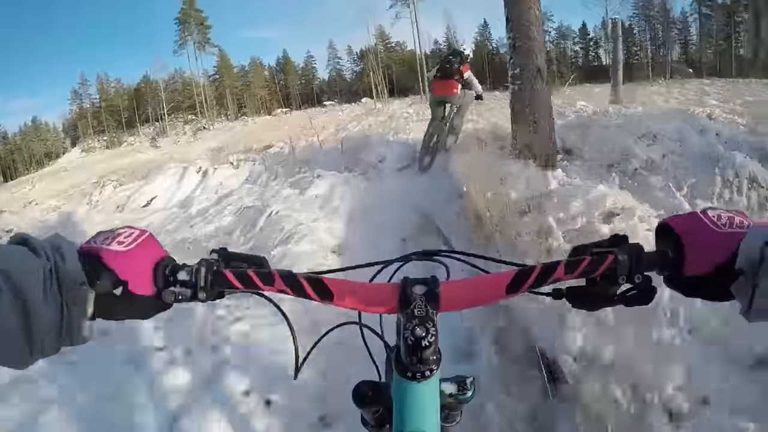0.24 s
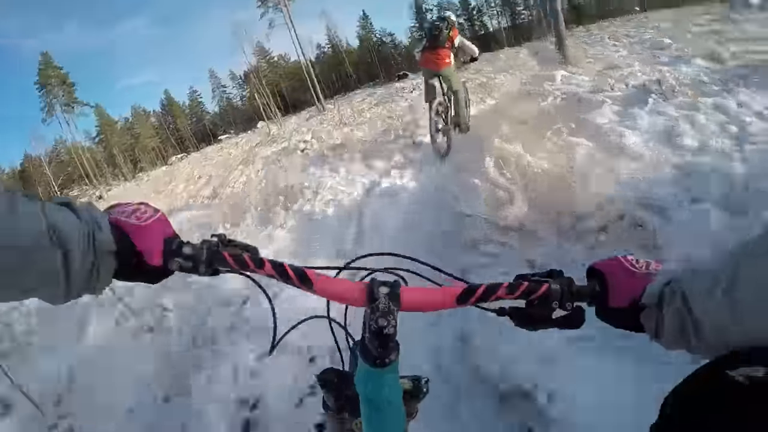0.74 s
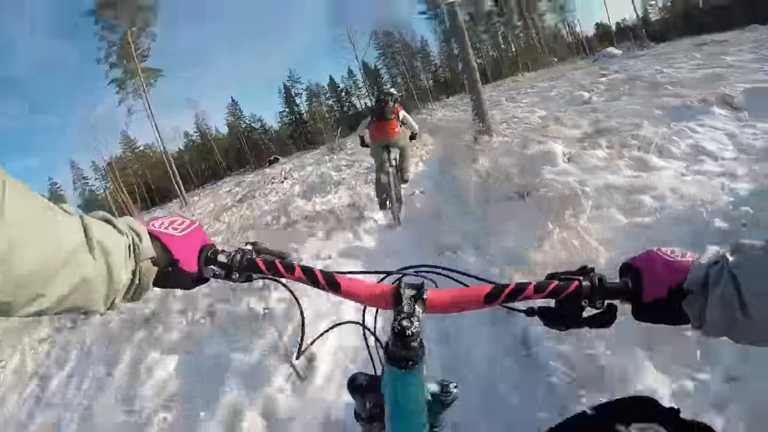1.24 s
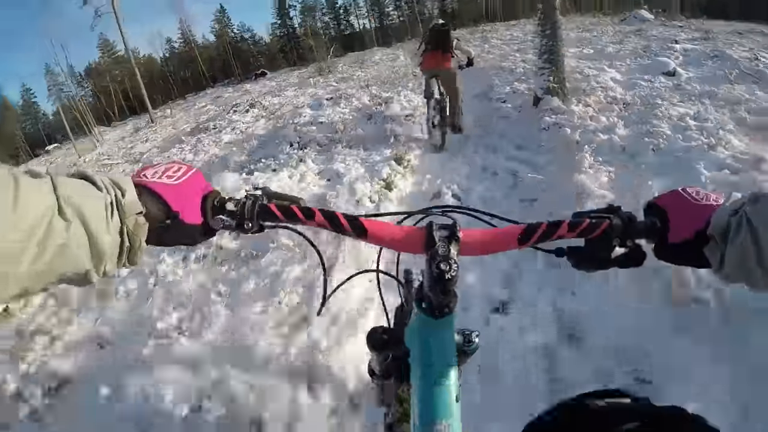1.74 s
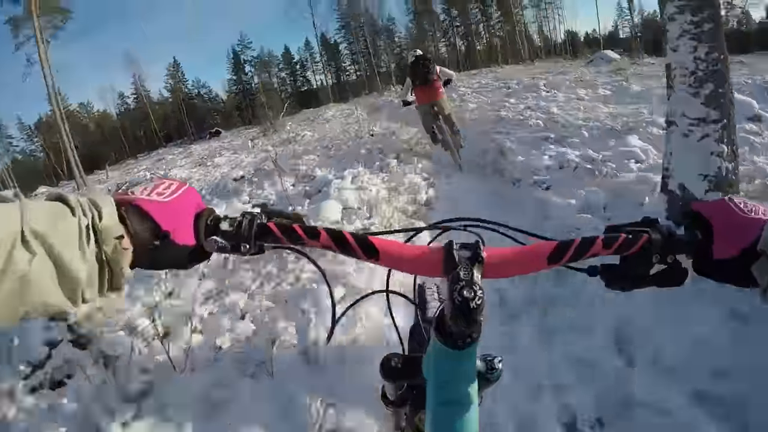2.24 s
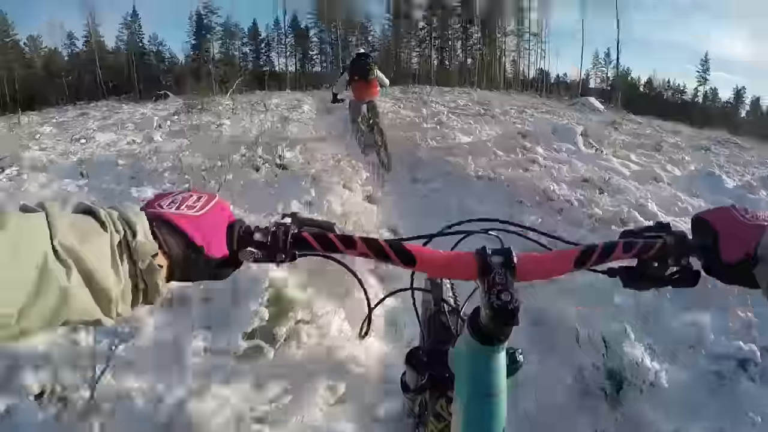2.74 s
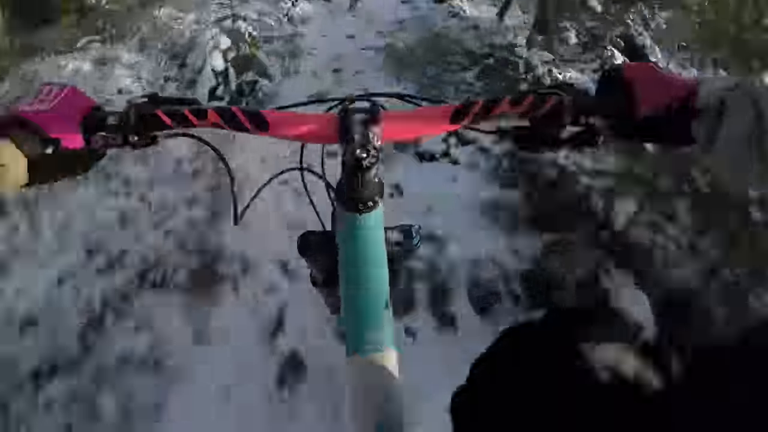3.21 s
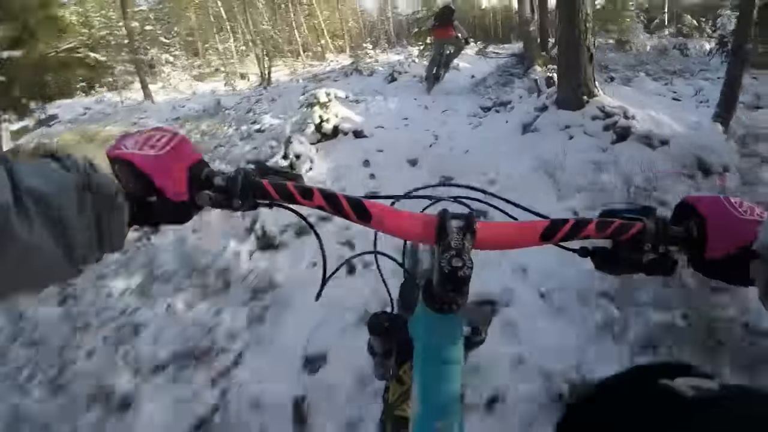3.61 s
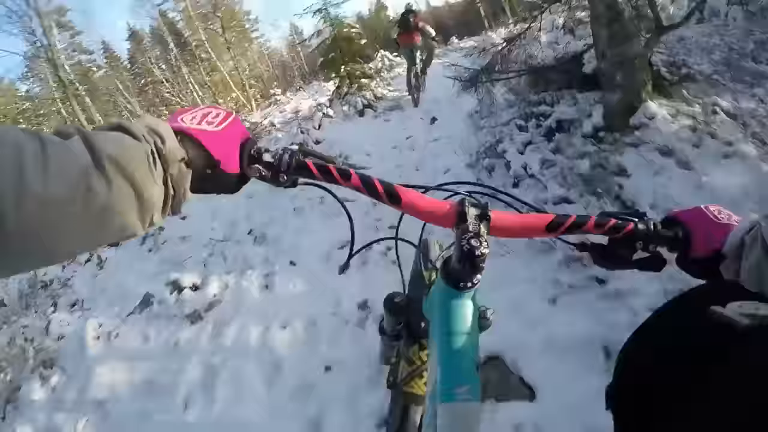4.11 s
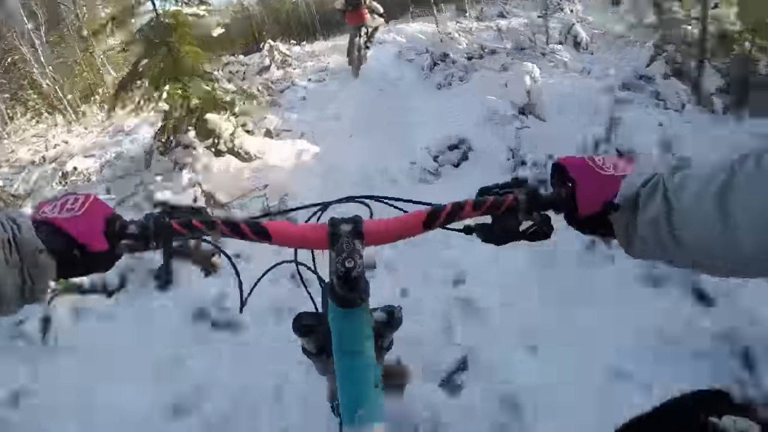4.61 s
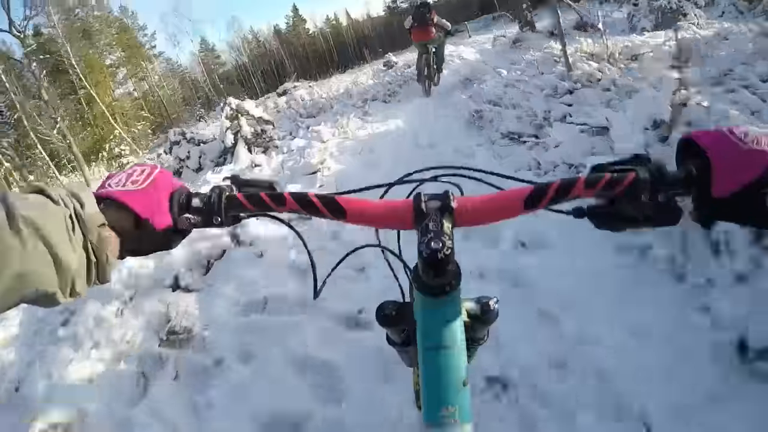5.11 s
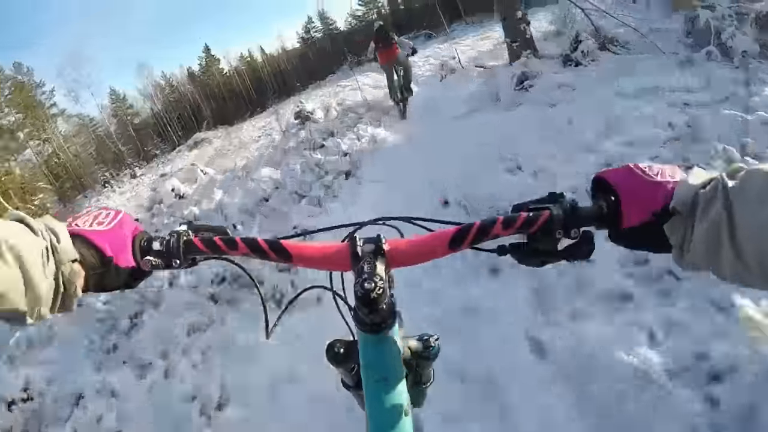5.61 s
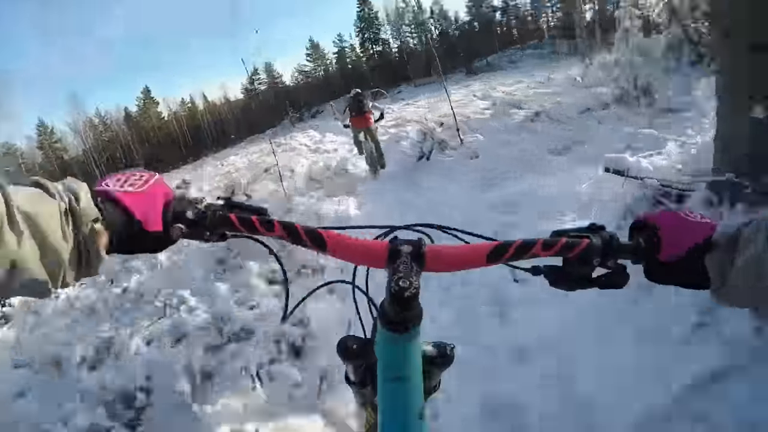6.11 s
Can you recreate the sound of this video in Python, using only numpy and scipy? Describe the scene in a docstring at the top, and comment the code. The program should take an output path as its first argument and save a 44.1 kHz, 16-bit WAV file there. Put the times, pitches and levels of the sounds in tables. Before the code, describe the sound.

Close on the rider's chest, outdoors and without echo, bike tyres grind through snow with a steady gritty rasp and soft powder hiss over a deep rumble. Two hard plastic clacks hit early, then the ride calms to light knocks. Midway comes a dense rattling run of loud clacks, soft thuds and icy crunches, thinning again before one last strong knock and a quieter ending.

```python
"""Mountain bike on a snowy trail

A mountain bike runs down a snowy forest trail, heard from a camera on the rider's chest.
The tyres hiss, rasp and crunch through snow: noises made of random clicks, each given its own spectrum.
Below lies a deep rumble of air and shaking, made of filtered noise, and a drone made of clicks.
Bumps make the camera's mount clack (a filtered ring) and sway (one slow swing). Roots thud through
the bike as a shove and fading tones, and flung snow ticks on the case."""
import sys
import numpy as np
from scipy import signal
from scipy.fft import rfft, irfft
from scipy.io import wavfile

SR = 44100
rng = np.random.default_rng(int(sys.argv[2]) if len(sys.argv) > 2 else 0)


def materialize(psi):
    """Save the field psi as 16-bit PCM at rate SR to the path in sys.argv[1].

    A 1-D psi becomes a single channel; in a 2-D psi each row is a channel.
    """
    bounded = np.clip(np.atleast_2d(psi).T, -1, 1)
    quanta = np.round(bounded * 32767).astype(np.int16)
    wavfile.write(sys.argv[1], SR, quanta)


N = 280035
T = np.arange(N) / SR  # time of every sample [s]

# how hard the bike runs over the ground: (time [s], pace [dB])
RIDING_PACE = [(0, 3.5), (.25, 0), (.6, -2), (.9, 2.5), (1.3, -0.5), (1.7, -4), (1.95, -2.5), (2.25, -1),
               (2.75, .5), (2.95, 0.5), (3.2, 2.5), (4.1, 5.5), (4.45, -0.5), (5.3, 1), (5.95, -4.5),
               (6.15, -.5), (6.35, -1)]
# a tyre meets a root or rut: (time [s], level [dB])
ROOT_HITS = [(0.057, -28), (0.791, -25.5), (0.868, -22.5), (0.961, -22.5), (2.144, -15.5), (2.552, -49),
             (2.756, -11), (2.772, -24), (2.796, -26), (2.865, -25), (3.108, -22), (3.38, -10.5),
             (3.461, -24.5), (3.626, -18.5), (3.708, -10.5), (3.86, -17.5), (3.913, -16), (4.081, -16),
             (4.244, -25), (4.327, -13.5), (4.413, -29.5), (5.354, -20), (6.335, -20.5)]
# the snow crust breaks: (time [s], level before rise and fade [dB], fade length [s])
CRUST_BREAKS = [(0.334, -44, 0.041), (0.673, -40.5, 0.017), (0.7074, -32.5, 0.012), (0.7955, -25, 0.0098),
                (0.8755, -29, 0.0085), (1.163, -47, 0.0095), (1.27, -34, 0.01), (3.026, -40, 0.031),
                (3.436, -38.5, 0.012), (3.766, -34, 0.013), (3.815, -31, 0.014), (3.89, -31.5, 0.016),
                (3.926, -31.5, 0.012), (3.96, -33, 0.01), (4.0037, -24.5, 0.0068), (4.1659, -34.5, 0.028),
                (4.269, -33.5, 0.015), (4.385, -40, 0.01), (4.723, -33, 0.0064), (4.779, -39, 0.01),
                (4.99, -34, 0.0046)]
# spectrum of breaking crust and loose icy grains: (frequency [Hz], relative level [dB])
ICY_COLOUR = [(600,-11.5),(1600,-2),(2300,8),(2750,5.5),(3300,-1),(4020,8),(4600,5.5),(5500,0.5),(7000,-6.5),(8300,-2),(10500,-17),(15000,-27)]
# snow lies in patches: how fast the level swings pass
PATCH_HZ = 8.7


def amp(db):
    """Turns decibels into gain."""
    return 10 ** (np.asarray(db) / 20)


def unit(x):
    """Scales a sound to an rms (average strength) of 1."""
    return x / np.sqrt(np.mean(x ** 2) + 1e-20)


def add(mix, s, sound):
    """Lays a sound into the mix at time s, cut off at the end of the mix."""
    part = mix[max(round(s * SR), 0):][:len(sound)]
    part += sound[:len(part)]


def level_curve(table):
    """Joins (time, dB) points by straight lines and gives a gain for every sample."""
    s, db = np.transpose(table)
    return amp(np.interp(T, s, db))


def spectrum(points, hz):
    """Joins (frequency, dB) points on a log-frequency axis and gives the gain at hz."""
    f, db = np.transpose(points)
    return amp(np.interp(np.log(hz + 1), np.log(f + 1), db))


def coloured(x, points):
    """Gives a noise its spectrum, at rms 1."""
    gain = spectrum(points, np.fft.rfftfreq(len(x), 1 / SR))
    return unit(irfft(rfft(x) * gain, len(x)))


def struck(gain):
    """A ring with this spectrum that starts at the blow (minimum phase), at peak 1."""
    response = np.exp(np.conj(signal.hilbert(np.log(gain + 1e-6))))
    ring = np.fft.ifft(response).real[:len(gain) // 2]
    return ring / abs(ring).max()


def wander(rate_hz):
    """Smooth random swings of rms 1, mostly slower than the rate."""
    hz = np.fft.rfftfreq(N, 1 / SR)
    slow = np.exp(-(hz / rate_hz) ** 2)
    return unit(irfft(rfft(rng.standard_normal(N)) * slow, N))


def grains(per_s, spread_db):
    """Snow grains snapping: random clicks, a few of them large, at rms 1."""
    size = amp(spread_db * np.minimum(rng.exponential(1, N), 4))
    sign = rng.choice([-1, 1], N)
    snaps = rng.random(N) < per_s / SR
    return unit(size * sign * snaps)


def bursts(table, attack):
    """The level of short bursts that rise quickly and die away over their length."""
    level, t = np.zeros(N), np.arange(SR // 6) / SR
    for s, level_db, length in table:
        rise = 1 - np.exp(-t / attack)
        add(level, s, amp(level_db) * rise * np.exp(-(t / length) ** 2))
    return level


def aftermath(events, fade_s, growth):
    """Level left behind by events: it rises quickly, fades, and is greater after a strong one."""
    power, strongest = np.zeros(N), max(row[1] for row in events)
    rise = 1 - np.exp(-T / 0.036)
    shape = rise * np.exp(-T / fade_s)
    for s, level_db, *_ in events:
        add(power, s, (amp(growth * (level_db - strongest)) * shape) ** 2)
    return np.sqrt(power)


def thrown_snow():
    """Level of flying powder: a steady share follows the pace, and spray rises and settles after crunches."""
    # level at a pace of 0 dB, and dB gained per dB of pace
    hiss_db, hiss_growth = -52, 0.64
    # spray level before its rise and fade [dB], fade time [s], dB gained per dB of crunch
    spray_db, spray_s, spray_growth = -46, 0.24, 0.41
    steady = amp(hiss_db) * level_curve(RIDING_PACE) ** hiss_growth
    spray = amp(spray_db) * aftermath(CRUST_BREAKS, spray_s, spray_growth)
    return np.hypot(steady, spray)


def tyres():
    """Knobs pack the snow in uneven clumps, louder with the pace, and powder hisses as it flies."""
    # spectrum of the snow packing: (frequency [Hz], relative level [dB])
    roll_colour = [(200,-2.5),(400,-10.5),(720,-11.5),(900,-7.5),(1150,-9.5),(1400,-4),(1630,3),(2020,-6.5),(2400,-1),(2900,-7.5),(4200,-21),(6000,-29),(10000,-36.5)]
    # spectrum of the flying powder: (frequency [Hz], relative level [dB])
    hiss_colour = [(1500,-2),(3000,0),(4050,2),(4950,0.5),(5500,-5),(6200,-2.5),(7100,-11),(8000,-6.5),(9600,-11.5),(10600,-18.5),(12100,-17.5),(13000,-24),(14700,-37),(16000,-38)]
    # level at a pace of 0 dB, and dB gained per dB of pace
    roll_db, roll_growth = -41.5, 0.95
    roll_patch_db, hiss_patch_db = 1.58, 0.47  # rms swing from patch to patch [dB]
    patches = wander(rate_hz=PATCH_HZ)
    roll = amp(roll_db + roll_patch_db * patches) * level_curve(RIDING_PACE) ** roll_growth
    hiss = thrown_snow() * amp(hiss_patch_db * patches)
    uneven = amp(2.2 * wander(rate_hz=70))  # the clumps, shared by both sounds
    packing = coloured(grains(per_s=4000, spread_db=2.5), roll_colour)
    powder = coloured(grains(per_s=6000, spread_db=1), hiss_colour)
    return roll * uneven * packing + hiss * uneven * powder


def rumble():
    """Air and shaking heave below the tyres' drone, which follows the pace and shudders after thuds."""
    # air and shaking at the chest: (time [s], level [dB])
    heave_levels = [(0, -8.5), (.15, -25), (.45, -28.5), (.68, -15), (.95, -27), (1.85, -25.5),
                    (2.1, -20.5), (2.5, -20), (2.75, -25), (3.4, -17), (4.2, -16.5), (4.4, -24),
                    (4.88, -17.5), (5.7, -25), (6.35, -23)]
    # spectrum of the air and shaking: (frequency [Hz], relative level [dB])
    rumble_colour = [(5,-50),(13,-6),(20,1),(27,-8),(35,-22),(45,-12),(60,-31.5),(100,-39.5),(200,-97)]
    # spectrum of the tyres' drone: (frequency [Hz], relative level [dB])
    drone_colour = [(35,-20),(70,5.5),(110,-2.5),(180,-4.5),(240,-11.5),(320,-21),(600,-30.5),(1500,-82)]
    # level at a pace of 0 dB, dB gained per dB of pace, rms swing from patch to patch [dB]
    drone_db, drone_growth, drone_patch_db = -42.5, 1.07, 1.34
    # shudder level before its rise and fade [dB], fade time [s], dB gained per dB of thud
    shudder_db, shudder_s, shudder_growth = -41, 0.08, 0.4

    patches = amp(drone_db + drone_patch_db * wander(rate_hz=PATCH_HZ))
    steady = patches * level_curve(RIDING_PACE) ** drone_growth
    shudder = amp(shudder_db) * aftermath(ROOT_HITS, shudder_s, shudder_growth)
    drone = np.hypot(steady, shudder)

    deep = coloured(rng.standard_normal(N), rumble_colour)
    deep = unit(deep / np.sqrt(abs(signal.hilbert(deep)) + 1.2))  # the harness evens out the swings
    ground = coloured(grains(per_s=430, spread_db=1.5), drone_colour)
    ground = ground * amp(3.1 * wander(rate_hz=30))
    return level_curve(heave_levels) * deep + drone * ground


def grit():
    """Loose icy grains tick one by one, louder the more snow the tyres throw."""
    ticks = coloured(grains(per_s=76, spread_db=2.8), ICY_COLOUR)
    return amp(-9.5) * thrown_snow() * ticks


def scuffs():
    """The tread slips through loose snow in a short rasp of many small clicks."""
    # the slips: (time [s], level before rise, fade and a 1 dB lift [dB], fade length [s])
    slips = [(0.01, -28.5, 0.015), (0.125, -39.5, 0.055), (0.1796, -33.5, 0.024), (0.437, -36, 0.022),
             (0.4645, -36, 0.03), (0.704, -32.5, 0.033), (1.301, -34.5, 0.014), (1.483, -35.5, 0.015),
             (2.836, -35, 0.021), (3.0144, -30, 0.033), (3.116, -33, 0.033), (3.205, -34, 0.029),
             (3.332, -36.5, 0.018), (3.552, -30.5, 0.01), (3.957, -31, 0.012), (4.395, -42, 0.024),
             (5.33, -37.5, 0.026), (5.7795, -32.5, 0.027)]
    # spectrum of the rasp: (frequency [Hz], relative level [dB])
    scuff_colour = [(300,0),(720,-11.5),(900,1.5),(1150,-1.5),(1650,6),(2050,3),(2400,2),(2750,0),(3300,-3.5),(4200,-11),(6000,-27),(10000,-32)]
    rasp = coloured(grains(per_s=4500, spread_db=1.0), scuff_colour)
    return amp(1.0) * bursts(slips, attack=0.0029) * rasp


def thuds():
    """Blows through the soft tyres give one shove and ring the bike briefly."""
    # the bike's dull ring: (frequency before a random shift [Hz], relative level [dB], time to fall 60 dB [s])
    frame_modes = [(70,-13.5,0.11),(118.7,9,0.032),(175.4,0.5,0.067),(226,1,0.046),(289,-23,0.2)]
    # the first shove: its height beside the ring, when it peaks and how wide it is
    shove_height, shove_at_s, shove_width_s = 0.95, 0.00394, 0.0014
    out, t = np.zeros(N), np.arange(SR // 6) / SR
    swell = 1 - np.exp(-(t / .004) ** 2)
    shove = shove_height * np.exp(-((t - shove_at_s) / shove_width_s) ** 2)
    for s, level_db in ROOT_HITS:
        ring = np.zeros(len(t))
        for hz, db, t60 in frame_modes:
            pitch = hz * rng.uniform(0.736, 1.05)
            ring += amp(db - 60 * t / t60) * np.sin(2 * np.pi * pitch * t)
        ring = ring * swell
        add(out, s, -amp(level_db) * (1.05 * ring / abs(ring).max() + shove))
    return out


def clack(bright_db, swell_hz=1900, size=2048):
    """One clack of the mount; a soft contact trades the upper modes for the lower ones."""
    # what the mount and case ring with, before each blow's random changes:
    # (frequency [Hz], least width [Hz], relative level [dB])
    case_modes = [(481,336,-17.5),(847,145,-10.5),(1221,320,-6),(1676,343,1.5),(2002,250,-7),(2318,328,-1.5),(3003,340,-17.5),(3420,270,-21.5),(4183,250,-17.5),(4290,300,-45),(5190,300,-24.5),(5600,350,-33),(6600,350,-30),(7260,370,-30.5),(11100,4100,-48.5)]
    gain, hz = 0, abs(np.fft.fftfreq(size, 1 / SR))
    for f, width, db in case_modes:
        # each blow lands on another spot and meets another grip
        spot_db = rng.normal(0, min(1.4 + f / 2000, 4))
        pitch = f * rng.normal(1, .012)
        damped = max(width, .07 * f)  # plastic damps every mode quickly
        # the contact matters most for the modes around and just above 2 kHz, less far above
        upper = (.9 + .9 * np.tanh((f - 1970) / 200)) / (1 + (f / 2800) ** 8)
        lower = .8 / (1 + (f / 950) ** 4)
        height = amp(db + spot_db + bright_db * (upper - lower))
        gain = gain + height / (1 + ((hz - pitch) / damped) ** 2 * 2) ** 2
    # the case takes about a cycle to get going: an all-pass delays its main modes
    poles = signal.iirpeak(swell_hz, 1, SR)[1]
    ring = signal.lfilter(poles[::-1], poles, struck(gain))
    return ring / abs(ring).max()


def sway(sway_hz=27, delay=0.0038, crest=0.014, length=0.033):
    """The camera swings on its harness after a jolt: a slow wave that soon dies (times in s)."""
    t = np.arange(SR // 8) / SR
    swing = np.sin(2 * np.pi * sway_hz * (t - delay))
    return swing * np.exp(-((t - crest) / length) ** 2) * (1 - np.exp(-t / 0.0042))


def mount():
    """Each bump gives a clack and a slow swing."""
    # the bumps: (time [s], clack peak [dB], contact brightness [dB, weighted by mode],
    # sway level before its rise and fade [dB])
    bumps = [(0.0648, -12, 5, -24), (0.7907, 1, 5, -7.5), (0.8688, 2, 2.5, -6.5), (1.0171, -15.5, 5.5, -15),
             (1.1005, -12, 4.5, -23), (1.5107, -17.5, 0.5, -32), (1.6286, -20.5, 4, -27),
             (1.735, -17, 0.5, -49), (1.8341, -10.5, 4, -22.5), (1.8991, -14, 3.5, -16),
             (2.0459, -18, 4.5, -41), (2.1299, -18, 3, -29), (2.4885, -10.5, 3, -19), (2.5585, -7, 5, -8),
             (2.7562, -14, -4.5, -38), (2.793, -1.5, 1.5, -9.5), (3.0302, -26, 15, -8.5),
             (3.1069, -13.5, 3, -10), (3.2196, -12, -7, -24), (3.2622, -14.5, 2, -37),
             (3.379, -2, -7.5, -19), (3.398, -15.5, -11, -15), (3.4641, -9, 6, -7.5),
             (3.5173, -20.5, 7, -39), (3.6277, -3.5, 4, -12), (3.682, -16.5, 3, -34), (3.705, 0, 3.5, -8),
             (3.8582, 1, 4, -21), (3.9362, -1.5, 3.5, -36), (4.0328, -6.5, 2.5, -36), (4.244, 0.5, 3.5, -8),
             (4.3264, 1, -8.5, -24), (4.518, -9, 4, -10.5), (4.582, -17, 7, -68), (4.6174, -17.5, 4, -22),
             (4.6695, -10, 5, -43), (4.7518, -12, 4, -17), (4.82, -7.5, 4, -13.5), (4.9679, -13, 5, -22),
             (5.0208, -8.5, 3.5, -16), (5.3513, 1, 3, -7), (5.4216, -16, 1, -15.5), (5.4925, -11.5, 4, -24),
             (6.3335, -10, -0.5, -8.5)]
    out = np.zeros(N)
    for s, peak_db, bright_db, sway_db in bumps:
        add(out, s, amp(peak_db) * clack(bright_db))
        add(out, s, amp(sway_db) * sway())
    return out


def crunches():
    """Breaking crust: a quick clump of coarse grains."""
    crackle = coloured(grains(per_s=2200, spread_db=3.6), ICY_COLOUR)
    return bursts(CRUST_BREAKS, attack=0.0006) * crackle


def crumbs():
    """Icy crumbs strike the case in a tick and shatter, each with its own brightness."""
    # the strikes: (time [s], level of the first tick [dB], brightness [dB per octave])
    strikes = [(0.788, -34, -5), (0.8054, -38, -2), (0.8114, -39, 2), (3.085, -31, 16), (3.1185, -34.5, 9),
               (3.1595, -29, 0), (3.1686, -19, 11), (3.2316, -33, 15), (3.821, -21.5, -4.5),
               (3.897, -31, 6), (4.1671, -21.5, 2), (4.1714, -37, 5), (4.1844, -29, 4), (4.3754, -37, 6),
               (4.9885, -31.5, 5)]
    # spectrum of a tick before its tilt: (frequency [Hz], relative level [dB])
    crumb_colour = [(1500,-36),(4000,0),(6500,4),(8000,8),(11000,-5.5),(14600,-10),(16000,-22.5)]
    out, t = np.zeros(N), np.arange(SR // 30) / SR
    hz = abs(np.fft.fftfreq(512, 1 / SR))
    octaves = np.log2(np.maximum(hz / 8000, .5))  # the tilt turns about 8 kHz and stops one octave below
    for s, level_db, tilt_db in strikes:
        tick = struck(spectrum(crumb_colour, hz) * amp(tilt_db * octaves))
        shatter = .45 * rng.standard_normal(len(t)) * np.exp(-t / .0009)
        shatter[0] = 1  # the first touch
        add(out, s, amp(level_db) * np.convolve(shatter, tick))
    return out


def scene():
    """Adds all the sounds as heard by one microphone close by in open air, with no echo."""
    ground = tyres() + rumble() + grit() + scuffs()
    blows = thuds() + mount() + crunches() + crumbs()
    return (ground + blows)[None]


def record(dry):
    """Rounds off the loudest peaks softly, then removes what lies above about 15.7 kHz."""
    held = dry / (1 + dry ** 8) ** (1 / 8)
    low_pass = signal.firwin(511, 15700, window=("kaiser", 9), fs=SR)
    return signal.oaconvolve(held, low_pass[None], "same")


dry = scene()
out = record(dry)
materialize(out)
```